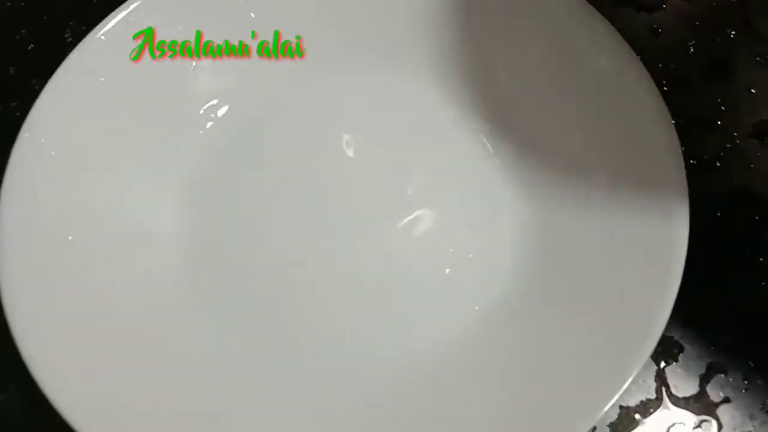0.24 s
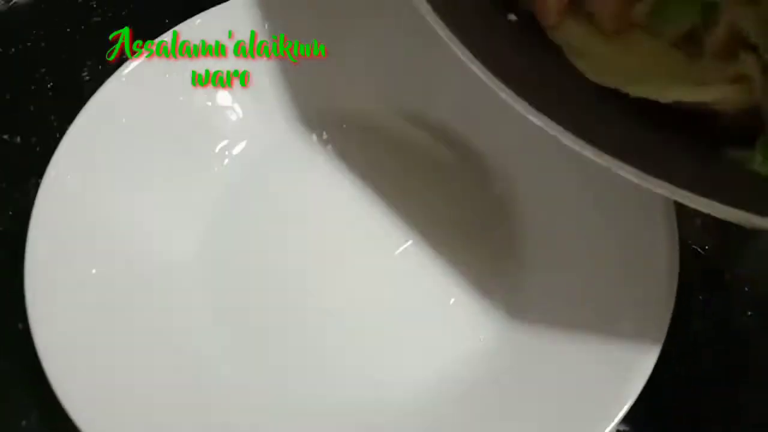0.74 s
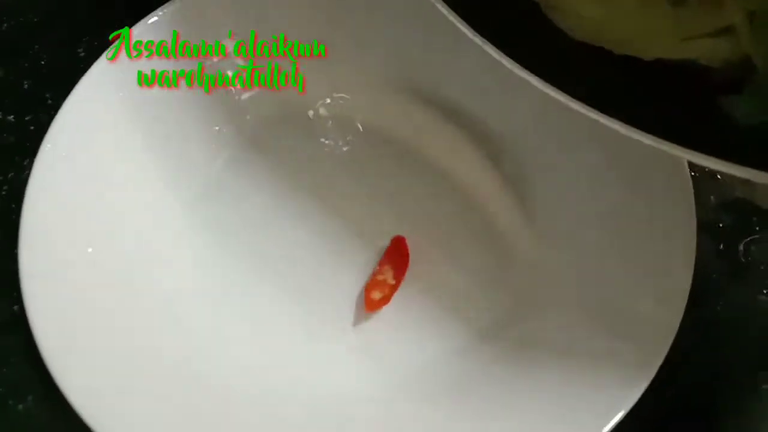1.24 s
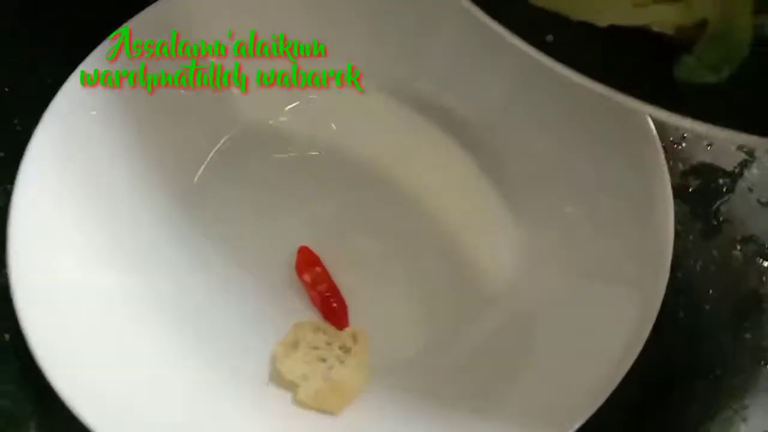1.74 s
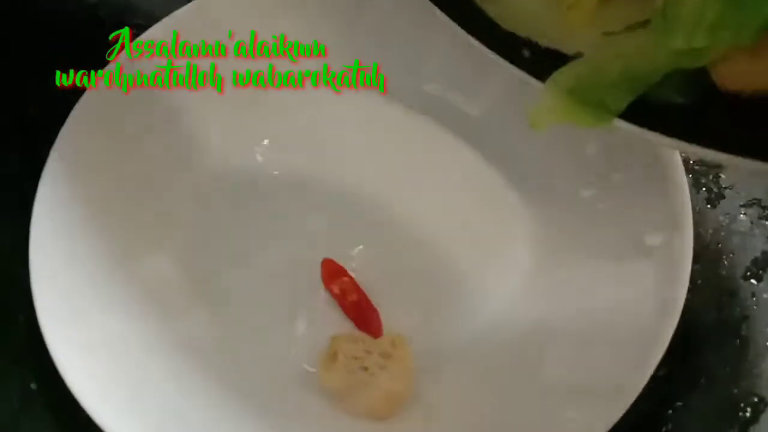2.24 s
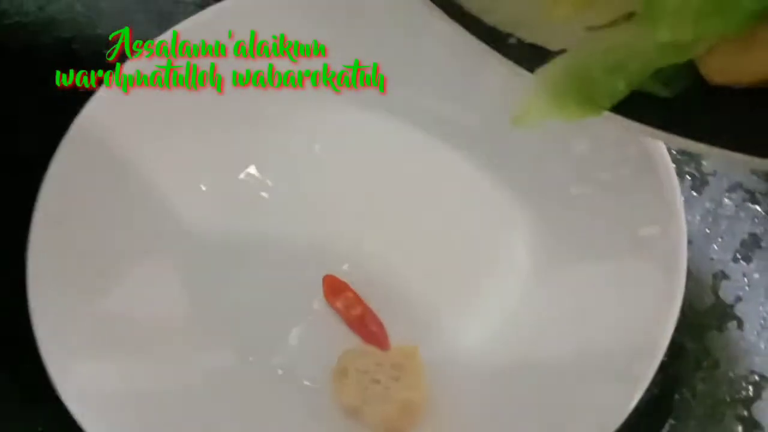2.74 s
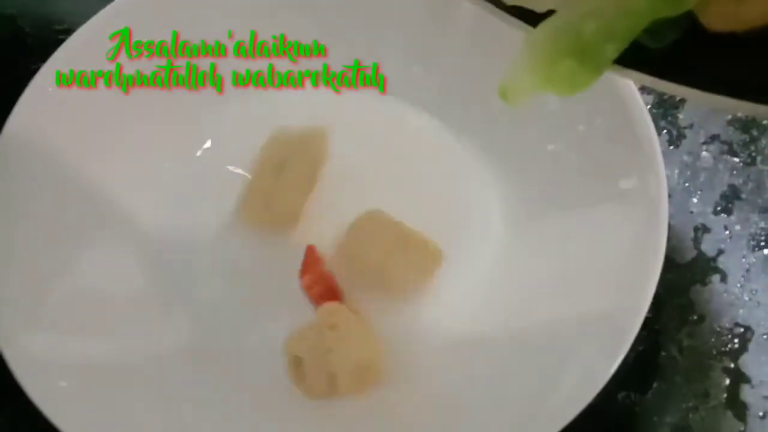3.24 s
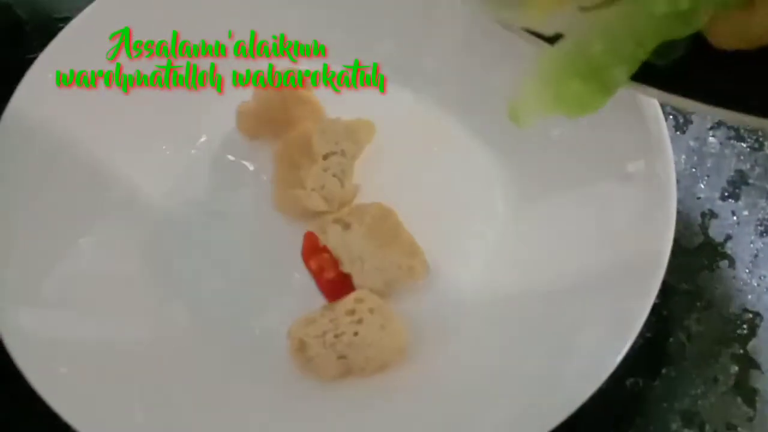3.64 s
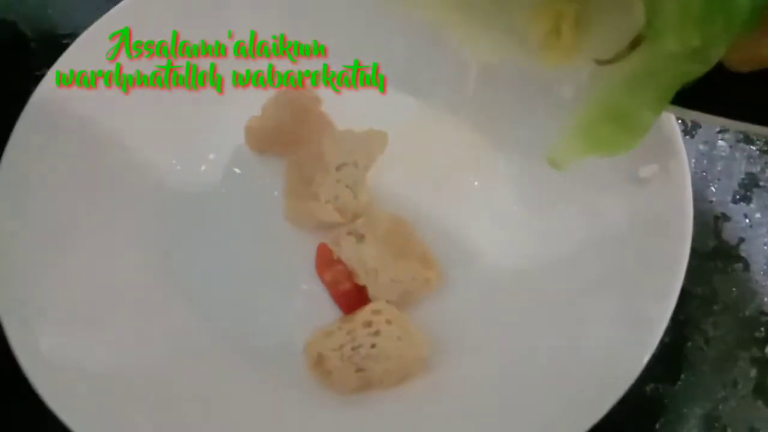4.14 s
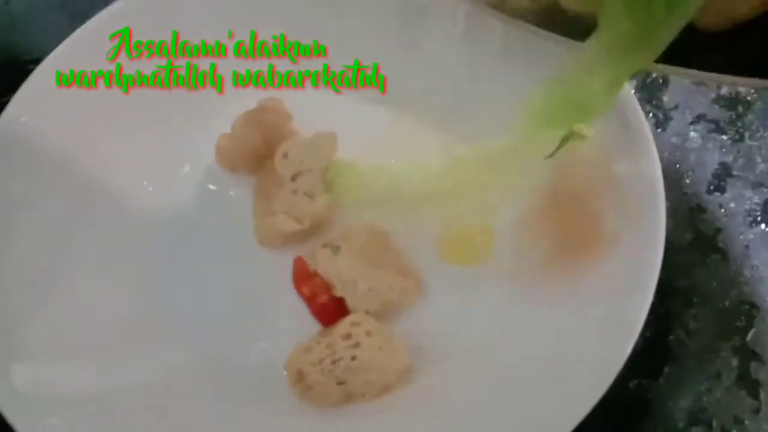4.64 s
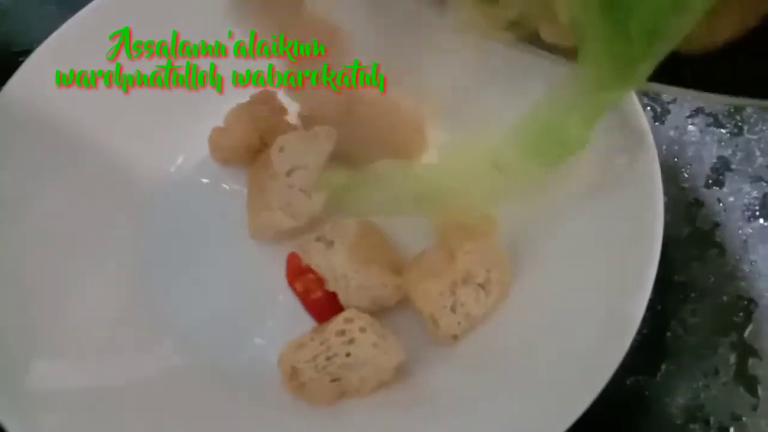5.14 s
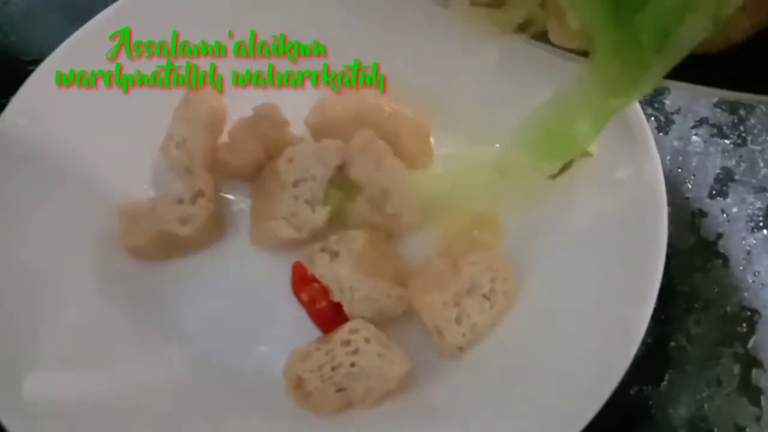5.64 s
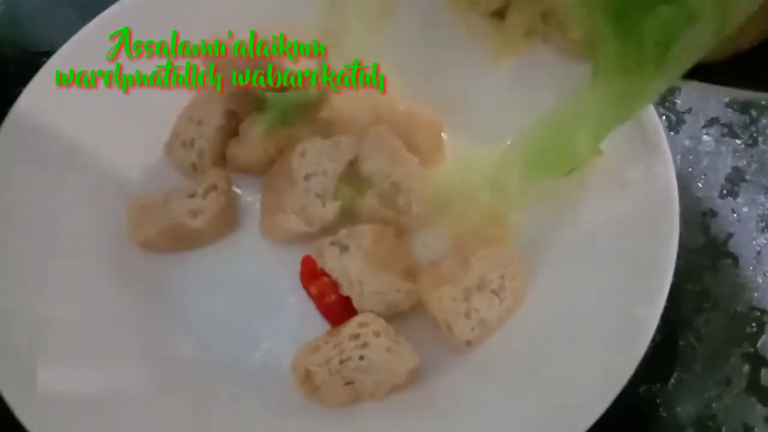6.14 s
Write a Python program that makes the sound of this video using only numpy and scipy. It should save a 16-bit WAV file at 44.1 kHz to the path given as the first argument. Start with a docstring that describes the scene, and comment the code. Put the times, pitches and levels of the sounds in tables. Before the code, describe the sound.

Faint room air and a low rumble that swells and sinks run throughout, heard close up in a small kitchen with short reflections. At about 1.1 seconds a metal pan knocks on a ceramic plate with a sharp, briefly ringing clank, a thud into the worktop and a tiny skid. A lighter double knock follows near 1.35 seconds. Wet tofu and greens then slither out quietly with a fine fizz, soft squelches and scattered ticks of sauce, the sharpest near 2.4 seconds and a few more around 3.3. One soft thud comes at 3.8 seconds. Around 4.9 to 5.1 seconds a utensil gives a cluster of dull taps. Lighter taps and a very short drag come near 5.7, then another drag and more taps from 6 to 6.4 seconds, with moist pieces plopping and pattering onto the plate.

```python
"""Tofu and greens are pushed out of a pan onto a ceramic plate, heard up close in a small kitchen.
It opens on room air and a low rumble that swells and sinks throughout. At 1 s the pan knocks on the
plate, thuds through to the worktop, skids and settles. The wet food then slithers out, air pockets
squelching and films of sauce snapping, with one soft thud near 3.8 s. From 4.9 s a utensil nudges
the rest out with dull taps and two short drags, and the pieces plop and patter as they land."""
import sys
import numpy as np
from scipy import signal
from scipy.fft import rfft, irfft, next_fast_len
from scipy.io import wavfile
from scipy.ndimage import uniform_filter1d

SR = 44100
rng = np.random.default_rng(int(sys.argv[2]) if len(sys.argv) > 2 else 0)


def file_out(sig):
    """Save sig as 16-bit WAV at sys.argv[1]."""
    # one column per channel
    cols = np.atleast_2d(sig).T
    # limit, then scale
    lim = np.clip(cols, -1, 1)
    pcm = np.round(lim * 32767).astype(np.int16)
    wavfile.write(sys.argv[1], SR, pcm)


N = 281358
TIME = np.arange(N) / SR
RING = TIME[:SR * 3 // 4]  # time axis of one hit and its tail

# the pan's edge knocks on the plate: start_s, level_db, contact_ms
KNOCKS = [(1.0626, -11, 0.035), (1.0649, -9, 0.03), (1.072, -20, 0.045), (1.132, -26, 0.11),
          (1.3432, -23.5, 0.07), (1.373, -29, 0.06)]
# pan and plate ringing together: pitch_hz, level_db, t60_s
PAN_MODES = [(146, -4, 0.36), (225, -7, 0.25), (294, -7, 0.33), (363, -13, 0.25), (514, -6, .16),
             (594, -4, 0.16), (831, -8, 0.22), (1061, -10, 0.45), (1194, -5.5, 0.3), (1330.5, -8.5, 0.53),
             (1755, -14, 0.47), (1840, -20, 0.4), (2272, -22, 0.35), (2580, -12.5, 0.35),
             (2880, -7.5, 0.18), (2972, -8, 0.15), (3102, -12, 0.16), (3230, -10, 0.12), (3951, -15, .15),
             (4334, -17, 0.18), (4743, -15, 0.2)]
# their dense, short-lived clatter: frequency_hz, level_db
PAN_CLATTER = [(60, -19), (130, -6), (310, 7), (385, -4), (550, -10), (700, -12), (1000, -9.5), (1350, -10),
               (2100, -23), (2800, -10.5), (5200, -8), (6400, -12), (7300, -11.5), (8500, -18),
               (11000, -14.5), (15500, -42)]
# the pan's weight thuds through to the worktop, and the last row is a separate soft bump near 3.8 s: start_s,
# level_db, contact_ms
THUDS = [(1.0608, -21.5, 0.1), (1.093, -30.5, 0.46), (1.3417, -30, 0.3), (1.372, -34, 0.32),
         (3.825, -25, 2)]
# the low ring of a thud: pitch_hz, level_db, t60_s
THUD_MODES = [(123, 8, 0.15), (230, 7, .14), (292, 7.5, 0.19), (590, 13.5, 0.093)]
# the worktop's broad thunk: frequency_hz, level_db
THUD_COLOUR = [(50, -14), (115, 0.5), (300, 4), (400, -11.5), (580, -0.5), (720, -23), (3000, -51)]
# the pan's stick-slip chatter: start_s, length_s, first_slips_per_s, last_slips_per_s, level_db
SKID = (1.085, .024, 500, 410, -10)
# the rim, choked while it is pressed and skids: pitch_hz, level_db, t60_s
RIM_MODES = [(449, -19, 0.24), (478, 3, 0.054), (834, -1, 0.075), (1205, -9, 0.05)]
# utensil taps and pieces landing: start_s, level_db, contact_ms, plop_hz
TAPS = [(4.8947, -22.5, 0.2, 535), (4.916, -18.5, 0.21, 328), (4.976, -30.5, 0.15, 400),
        (5.0387, -17, 0.11, 458), (5.583, -39.5, 0.068, 525), (5.669, -31, 0.33, 553),
        (5.699, -28.5, 0.16, 810), (6.0101, -21.5, 0.095, 1300), (6.07, -29, 0.098, 426),
        (6.1372, -22.5, 0.11, 934), (6.173, -35, 0.18, 1300), (6.372, -26.5, 0.075, 1170)]
# the food-damped ring of a tap: pitch_hz, level_db, t60_s
TAP_MODES = [(138, -26, 0.29), (305, 0, 0.13), (400, -6.5, 0.066), (601.7, 3.5, 0.17), (1026, 8.5, 0.13),
             (1280, 10.5, 0.052), (1420, 7.5, 0.047), (1730, 3, 0.033), (2300, -2, 0.045), (5370, -35, .3),
             (7030, 19.5, 0.027)]
# the noisy body of a tap: frequency_hz, level_db
TAP_CLATTER = [(80, -39), (190, -30), (310, 9), (580, -3), (700, -8.5), (1050, 1), (1500, -1), (2000, -7),
               (3200, -10.5), (5000, 0), (8500, -2), (15500, -29)]
# the utensil's low judder: start_s, length_s, first_slips_per_s, last_slips_per_s, level_db
DRAGS = [(5.67, 0.0173, 340, 269, -14.5), (5.984, 0.022, 300, 330, -9)]
# wet ticks and smacks of sauce: start_s, level_db, low_hz, high_hz, rise_ms
TICKS = [(0.944, -35.5, 4540, 11600, 1.7), (1.3228, -23.5, 1290, 7100, 0.72),
         (1.4891, -30, 2500, 16100, 0.99), (1.542, -34.5, 2310, 8000, 3), (1.622, -36, 4120, 12600, 2),
         (1.768, -33, 6000, 11900, 1.5), (1.876, -25, 2190, 16000, 0.88), (1.951, -23, 1600, 5530, 0.65),
         (2.301, -32.5, 7740, 11000, 1.3), (2.365, -18, 3600, 10100, 0.71), (3.248, -27, 1800, 7050, 3.9),
         (3.304, -30.5, 4000, 12000, 1), (3.451, -35, 1500, 6700, 4.3), (4.585, -43.5, 6400, 13100, 5.6),
         (4.975, -29.5, 3000, 8100, 3.6), (5.165, -41.5, 2940, 8900, 5.3), (5.864, -37, 1370, 8200, 4.7),
         (6.074, -25, 3150, 8060, 3.7)]
# EQ over all the ticks: frequency_hz, gain_db
TICK_COLOUR = [(5600, 0.0), (6400, -7.0), (7300, -3.5), (11000, -2), (13500, -13), (15500, 2)]
# level ride of the food sliding over the pan: time_s, level_db
SLIDE_LEVEL = [(0.0, -72), (0.53, -71), (0.69, -67), (1.08, -66.5), (1.24, -56), (2.43, -58), (2.72, -53.5),
               (3.3, -56), (3.45, -59.5), (4.46, -64.5), (4.94, -61.5), (5.35, -68), (6.17, -63),
               (6.38, -69)]
# EQ of the slide: frequency_hz, gain_db
SLIDE_COLOUR = [(200, 1), (700, -10.5), (1100, -20), (1300, 8), (1900, 2.5), (2400, 5), (3500, 2),
                (4300, -7), (5000, 3.5), (5900, -1), (6400, -13.5), (7300, -2), (8400, -41), (15000, 1)]
# level ride of the hot sauce's fine, high fizz: time_s, level_db
FIZZ_LEVEL = [(0.0, -82), (1.1, -71), (1.5, -63), (2.2, -68), (3.3, -67.5), (3.7, -72), (3.95, -64),
              (4.35, -70), (4.9, -66.5), (5.4, -71), (6.38, -68.5)]
# tone of the fizz: frequency_hz, level_db
FIZZ_COLOUR = [(4000, -6.5), (7500, 1.5), (9700, 4.5), (11500, -2), (13500, -16), (15000, -2.5),
               (16000, -3)]
# soft squelches of shifting, tumbling food: start_s, length_s, level_db, centre_hz
SQUELCHES = [(0.709, 0.16, -63, 1760), (1.343, 0.03, -54.5, 920), (2.463, 0.45, -61, 1940),
             (3.222, 0.061, -57, 1040), (3.272, 0.2, -57, 321), (3.296, 0.094, -53.5, 1480),
             (4.916, 0.066, -47.5, 830), (5.558, 0.066, -54, 485), (6.035, 0.12, -47, 780)]
# swells of the low rumble: start_s, length_s, level_db
RUMBLE_SWELLS = [(0.101, .14, -53), (0.752, 0.13, -50.5), (1.6, 0.12, -51), (1.821, 0.25, -56),
                 (2.498, 0.47, -55), (3.797, 0.32, -49.5), (4.314, 0.07, -48.5), (4.785, 0.083, -52.5),
                 (4.956, 0.13, -51), (5.55, 0.081, -54.5), (6.048, 0.24, -52)]
# tone of the rumble: frequency_hz, level_db
RUMBLE_COLOUR = [(25, -42), (55, -55), (95, 1), (150, 8), (200, -7), (260, -24.5), (330, -8.5),
                 (500, -31.5), (900, -22.5), (2000, -54), (8000, -79)]
# the bed of kitchen air: frequency_hz, level_db
AIR_COLOUR = [(30, -17.5), (120, 4.5), (250, -2.5), (350, 1), (550, -12), (900, -13.5), (1100, -8),
              (1600, -36), (4500, -22.5), (5400, -21), (6200, -42), (7200, -19), (9000, -56), (13500, -32),
              (15500, -44)]
# faint stereo hiss: frequency_hz, level_db
WIDTH_HISS_COLOUR = [(30, -3), (130, -6), (970, -10.5), (1260, 2.5), (1470, -7), (5590, -21), (6370, -40),
                     (10700, -40), (15500, -21)]

CRUNCH_DB, CRUNCH_T60_S = -6.5, 0.016  # metal grinds on the glaze for an instant at each knock
DRAG_HZ, DRAG_T60_S = 367, 0.0075  # the food-filled pan's dull answer to each slip
PLOP_DB, PLOP_T60_S, PLOP_RISE_PER_S = -7, 0.051, 5.4  # a soft piece wobbles, rising as it flattens
SETTLE_DB, SETTLE_CONTACTS_PER_S = -40.5, 410
SETTLE_LEAD_S, SETTLE_DECAY_S = 0.0037, 0.011  # time constants of the patter's power around a tap
SQUELCH_POPS_PER_S = 350
RUMBLE_REST_DB, SWELL_RAMP_S = -61, 0.022
AIR_DB, HOLLOW_DB, WIDTH_HISS_DB = -59, -61, -78.5


def pan():
    """The pan thuds into the worktop, and a soft bump sounds near 3.8 s; each knock crunches on the glaze and
    rings pan and plate."""
    out = np.zeros(N)
    for s, db, contact_ms in THUDS:
        thunk = body(THUD_MODES, THUD_COLOUR, clatter_db=11.5, t60=0.24, crack_db=44, scatter_db=0)
        add(out, s, undb(db) * signal.fftconvolve(thunk, push(contact_ms)))
    for s, db, contact_ms in KNOCKS:
        clang = body(PAN_MODES, PAN_CLATTER, clatter_db=2.5, t60=0.27, crack_db=15, scatter_db=2.5)
        crunch = undb(CRUNCH_DB) * dense(PAN_CLATTER, CRUNCH_T60_S)
        add(out, s, undb(db) * signal.fftconvolve(clang + crunch, push(contact_ms)))
    return out


def skid():
    """The slipping edge makes the rim bark and stirs the pan's clatter."""
    clatter = signal.fftconvolve(dense(PAN_CLATTER, t60=0.17), push(contact_ms=0.12))[:len(RING)]
    bark = undb(-20) * ringing(RIM_MODES, scatter_db=1.5) + undb(-21.5) * clatter
    return signal.fftconvolve(slips(*SKID), bark)[:N]


def utensil():
    """Soft drags that grow as the utensil presses, and food-cushioned taps, each with a plop."""
    judder = np.zeros(N)
    for s, length, *stroke in DRAGS:
        pressure = np.interp(TIME, [s, s + length], [.35, 1])
        judder += slips(s, length, *stroke) * pressure
    dull_ring = np.sin(2 * np.pi * DRAG_HZ * RING) * fade(DRAG_T60_S)
    out = undb(-15.5) * signal.fftconvolve(judder, dull_ring)[:N]
    for s, db, contact_ms, plop_hz in TAPS:
        cycles = plop_hz * RING * (1 + PLOP_RISE_PER_S * RING / 2)
        plop = undb(PLOP_DB) * np.sin(2 * np.pi * cycles) * fade(PLOP_T60_S)
        tap = body(TAP_MODES, TAP_CLATTER, clatter_db=17, t60=0.073, crack_db=11, scatter_db=3)
        add(out, s, undb(db) * signal.fftconvolve(tap + plop, push(contact_ms)))
    return out


def settling():
    """Wet pieces shift in a patter of soft contacts that builds just before each tap and dies away."""
    age = TIME[:, None] - np.array(TAPS)[:, 0]
    falloff = np.maximum(age / SETTLE_DECAY_S, -age / SETTLE_LEAD_S).min(axis=1)
    contacts = crackle(SETTLE_CONTACTS_PER_S, spread_db=2) * np.sqrt(SETTLE_CONTACTS_PER_S / SR)
    patter = contacts * np.exp(-falloff / 2)
    tap = body(TAP_MODES, TAP_CLATTER, clatter_db=19, t60=0.042, crack_db=12, scatter_db=1)
    soft_tap = signal.fftconvolve(tap, push(contact_ms=0.2))
    return undb(SETTLE_DB) * signal.fftconvolve(patter, soft_tap)[:N]


def sauce():
    """Films of sauce stretch and snap: a tick with a faint splutter behind it."""
    out = np.zeros(N)
    for s, db, low_hz, high_hz, rise_ms in TICKS:
        age = RING * 1000 / rise_ms
        tick = age * np.exp(-age)
        splutter = undb(-26) * fade(0.21) * (1 - np.exp(-age))
        band = signal.butter(2, [low_hz, high_hz], "band", fs=SR, output="sos")
        snap = signal.sosfilt(band, rng.standard_normal(len(RING)) * (tick + splutter))
        add(out, s, undb(db) * snap)
    return colour(out, TICK_COLOUR)


def slither():
    """Wet food slides: countless small pops ring gaps that open and close, with fizz on top."""
    pops = crackle(per_second=5000, spread_db=2)
    gaps = sum((-1) ** k * resonate(pops, hz, q=13.6) * undb(3.24 * wander(20))
               for k, hz in enumerate(np.geomspace(700, 8000, num=26)))
    slide = unit(colour(gaps, SLIDE_COLOUR)) * undb(1.86 * wander(30))
    droplets = crackle(per_second=3500, spread_db=1.5)
    droplets += undb(-5.5) * crackle(per_second=160, spread_db=2.5)
    fizz = unit(colour(droplets, FIZZ_COLOUR)) * undb(2.1 * wander(25))
    return undb(ride(SLIDE_LEVEL)) * slide + undb(ride(FIZZ_LEVEL)) * fizz


def squelch():
    """Small pockets of air pop between wet pieces; each rings a few cycles and rises in pitch."""
    out = np.zeros(N)
    age = RING[:SR // 25]
    for s, length, db, centre_hz in SQUELCHES:
        cluster = np.zeros(N)
        count = int(length * SQUELCH_POPS_PER_S) + 1
        for when, pitch, size in rng.standard_normal((count, 3)):
            cycles = age * centre_hz * np.exp(.35 * pitch)
            pop = np.sin(2 * np.pi * cycles * (1 + 4 * age)) * np.exp(-cycles / 3)
            onset_s = s + length * (.5 + .5 * np.tanh(0.76 * when))
            add(cluster, onset_s, undb(2 * size) * pop)
        out += undb(db) * cluster * np.sqrt(length * SR / np.sum(cluster ** 2))
    return out


def reflections(x, t60):
    """Short echoes from close hard walls."""
    tail = rng.standard_normal(len(RING)) * fade(t60) * (RING > .004)
    return signal.fftconvolve(x, tail / np.linalg.norm(tail))[:N]


def background():
    """Swelling rumble, air that lifts with the sliding food, and a hollow tone that follows both."""
    held = sum(undb(db) * ((TIME > s) & (TIME < s + length)) for s, length, db in RUMBLE_SWELLS)
    swell = undb(RUMBLE_REST_DB) + uniform_filter1d(held, size=int(SR * SWELL_RAMP_S))
    rumble = noise(RUMBLE_COLOUR) * swell
    movement_db = ride(SLIDE_LEVEL) - ride(SLIDE_LEVEL).mean()
    air = noise(AIR_COLOUR) * undb(AIR_DB + 0.27 * movement_db + 2 * wander(2.4))
    narrow_band = resonate(rng.standard_normal(N), hz=1276, q=37.6)
    hollow = unit(resonate(narrow_band, hz=1284, q=3.8))
    hollow *= undb(HOLLOW_DB + 0.28 * movement_db + 2.8 * wander(11))
    return rumble + air + hollow * (swell / swell.mean()) ** 0.29


def body(modes, spectrum, clatter_db, t60, crack_db, scatter_db):
    """One hit in three layers: clear modes, a dense clatter that dies over t60, and a crack."""
    ring = ringing(modes, scatter_db)
    clatter = undb(clatter_db) * dense(spectrum, t60)
    return (ring + clatter + undb(crack_db) * crack(spectrum)) / 10


def ringing(modes, scatter_db):
    """Decaying modes; each blow lands elsewhere and weights them a little differently."""
    weights = undb(scatter_db * rng.standard_normal(len(modes)))
    return sum((-1) ** k * weights[k] * undb(db) * np.sin(2 * np.pi * hz * RING) * fade(t60)
               for k, (hz, db, t60) in enumerate(modes))


def dense(spectrum, t60):
    """Countless close resonances blur into noise and die away together."""
    return noise(spectrum, len(RING)) * fade(t60)


def crack(spectrum):
    """The tightest click with a given spectrum (minimum phase), at unit energy."""
    size = 2048
    cepstrum = irfft(np.log(eq_gains(spectrum, size)))
    click = irfft(np.exp(rfft(2 * cepstrum[:size // 2], size)))
    return np.pad(click / np.linalg.norm(click), (0, len(RING) - size))


def push(contact_ms):
    """Force of one contact: the longer it lasts, the duller the blow."""
    age = RING[:SR // 50] * 1000 / contact_ms
    force = age * np.exp(-age)
    return force / force.sum()


def slips(s, length, start_hz, end_hz, db):
    """Stick and slip: a short train of uneven jolts whose rate glides."""
    rate = np.interp(TIME, [s, s + length], [start_hz, end_hz], left=0, right=0)
    cycles = np.cumsum(rate * (1 + 0.027 * wander(150))) / SR
    jolts = np.diff(np.ceil(cycles), prepend=0)
    return jolts * undb(db + 1.8 * wander(140))


def crackle(per_second, spread_db):
    """Tiny wet pops of unequal size."""
    pops = (rng.random(N) < per_second / SR) * rng.choice([-1, 1], N)
    sizes_db = spread_db * np.minimum(rng.exponential(size=N), 5)
    return unit(pops * undb(sizes_db))


def noise(spectrum, samples=N):
    """Coloured noise at rms 1."""
    return unit(colour(rng.standard_normal(samples), spectrum))


def colour(x, spectrum):
    """Run a sound through an EQ curve."""
    size = next_fast_len(len(x))
    return irfft(rfft(x, size) * eq_gains(spectrum, size), size)[:len(x)]


def eq_gains(spectrum, size):
    """Gain at each FFT bin from frequency_hz, level_db points."""
    hz, db = np.transpose(spectrum)
    bins = np.maximum(np.fft.rfftfreq(size, 1 / SR), 1)
    return undb(np.interp(np.log(bins), np.log(hz), db))


def resonate(x, hz, q):
    """One resonance, gain 1 at its centre."""
    return signal.lfilter(*signal.iirpeak(hz, q, fs=SR), x)


def ride(points):
    """A fader ride in dB: straight lines between time_s, level_db points."""
    return np.interp(TIME, *np.transpose(points))


def fade(t60):
    """Exponential decay, 60 dB down after t60 seconds."""
    return np.exp(-np.log(1000) * RING / t60)


def wander(per_second):
    """Random drift with a spread near 1."""
    steps = rng.standard_normal(1024)
    return np.interp(TIME * per_second, np.arange(len(steps)), steps)


def add(track, s, sound):
    """Mix a sound into a track at s seconds."""
    start = int(s * SR)
    track[start:start + len(sound)] += sound[:max(N - start, 0)]


def undb(db):
    """Decibels to gain."""
    return 10 ** (np.asarray(db) / 20)


def unit(x):
    """Scale to rms 1."""
    return x / np.std(x)


def scene():
    """Everything sits in the centre; only a faint hiss gives width."""
    direct = pan() + skid() + utensil() + settling() + slither() + squelch() + sauce()
    mid = direct + undb(-8) * reflections(direct, t60=0.22) + background()
    side = undb(WIDTH_HISS_DB) * noise(WIDTH_HISS_COLOUR)
    return np.array([mid + side, mid - side])


def record(dry):
    """A phone drops the deepest bass and cuts the top."""
    low_cut = signal.butter(4, 56, "high", fs=SR, output="sos")
    high_cut = signal.ellip(10, .2, 80, 15750, fs=SR, output="sos")
    return signal.sosfilt(high_cut, signal.sosfilt(low_cut, dry))


dry = scene()
out = record(dry)
file_out(out)
```